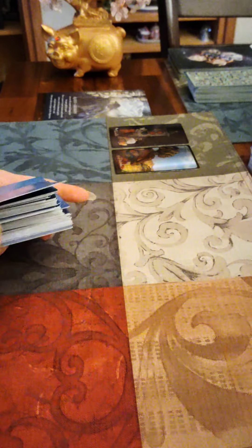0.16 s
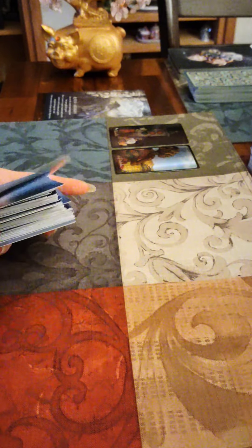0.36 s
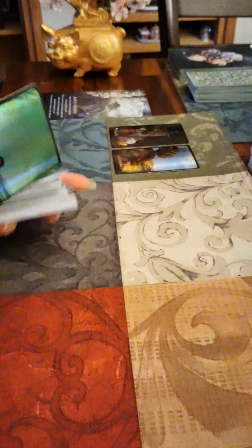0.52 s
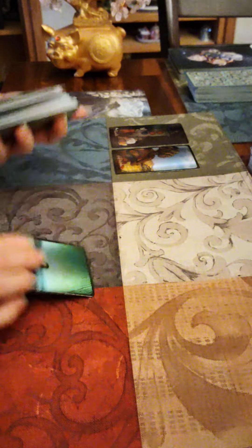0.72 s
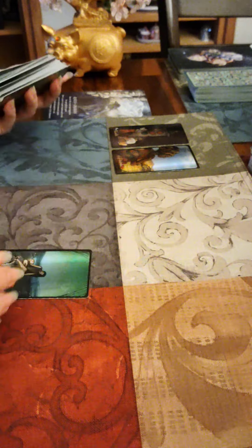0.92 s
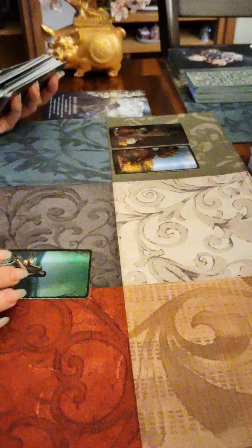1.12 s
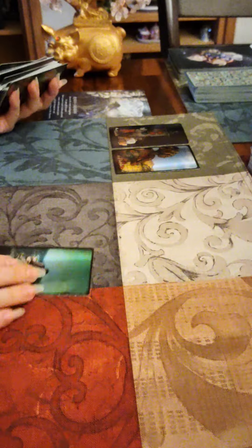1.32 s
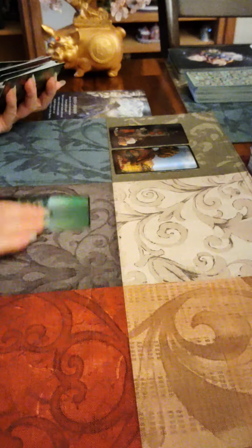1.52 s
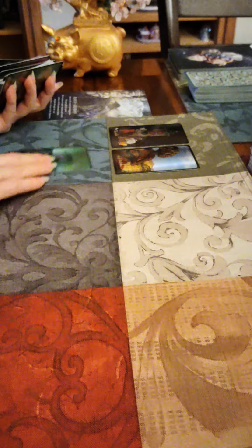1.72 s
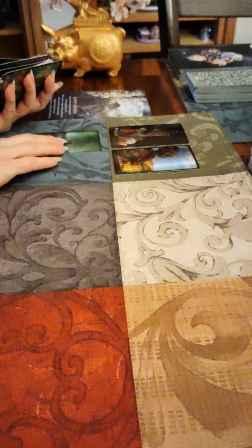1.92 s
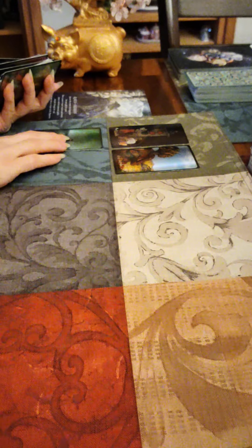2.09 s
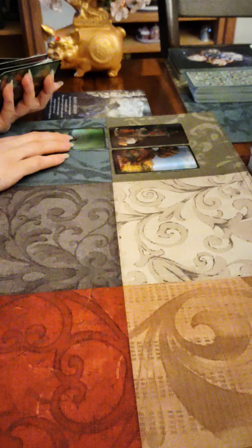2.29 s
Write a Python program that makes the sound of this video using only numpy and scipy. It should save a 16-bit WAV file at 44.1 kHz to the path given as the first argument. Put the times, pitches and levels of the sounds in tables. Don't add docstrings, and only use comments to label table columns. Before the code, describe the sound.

Close phone pickup in a small quiet room: a thumb rubs a deck with papery ticks, a card flicks free in a double snap, skids and slaps onto clothed table, nails click, and it slides over the weave.

```python
import sys
import numpy as np
from scipy import signal
from scipy.fft import rfft, irfft
from scipy.io import wavfile
from scipy.ndimage import uniform_filter1d

SR = 44100
rng = np.random.default_rng(int(sys.argv[2]) if len(sys.argv) > 2 else 0)


def pcm_store(signal):
    levels = np.round(np.clip(np.atleast_2d(signal), -1, 1) * 32767)
    wavfile.write(sys.argv[1], SR, levels.astype(np.int16).T)


def level_to_linear(level):
    exponent = np.asarray(level, float) / 20
    return 10 ** exponent


N = 103635


def evened(x):
    return x / np.sqrt(np.mean(x ** 2) + 1e-20)


def along(points, column=1):
    rows = np.array(points)
    return np.interp(np.arange(N) / SR, rows[:, 0], rows[:, column])


def read(points, hz):
    f, value = np.transpose(points)
    return np.interp(np.log(hz + 1), np.log(f + 1), value)


def colour(x, points):
    gain = level_to_linear(read(points, np.fft.rfftfreq(N, 1 / SR)))
    return evened(irfft(rfft(x) * gain, N))


def resonate(x, hz, width_hz):
    turn = np.exp(2j * np.pi * np.cumsum(hz * np.ones(len(x))) / SR)
    r = np.exp(-np.pi * width_hz / SR)
    return 2 * (turn * signal.lfilter([1 - r], [1, -r], x / turn)).real


def grit(per_s, spread_db, smooth, clump_s, clump_db):
    size = level_to_linear(spread_db * np.minimum(rng.exponential(1, N), 4))
    clicks = rng.standard_normal(N) * size * (rng.random(N) < per_s / SR)
    span = max(int(clump_s * SR), 2)
    clumps = evened(uniform_filter1d(uniform_filter1d(rng.standard_normal(N), span), span))
    return (evened(clicks) + smooth * rng.standard_normal(N)) * level_to_linear(clump_db * clumps)


def modes(part, t, pitch=1):
    return sum(level_to_linear(db - 60 * t / t60) * np.cos(2 * np.pi * hz * pitch * t - .6) for hz, db, t60 in part)


def hits(rows, parts, crack_s, crack, click, thin_hz, dull_hz):
    t, out = np.arange(4096) / SR, np.zeros(N + 8192)
    push = t[:256] * np.exp(-t[:256] / .00009)
    thin = signal.butter(2, thin_hz, "high", fs=SR)
    dull = signal.butter(2, dull_hz, fs=SR)
    edge_only = signal.butter(3, 4900, "high", fs=SR)
    for s, low_db, mid_db, top_db, mid_hz in rows:
        noise = rng.standard_normal(512)
        blow = crack * noise * np.exp(-t[:512] / crack_s)
        blow[0] = -1
        blow = signal.lfilter(*thin, blow)
        crackling_push = push + .4 * push.max() * noise[:256] * np.exp(-t[:256] / crack_s)
        low = -signal.fftconvolve(crackling_push, modes(parts[0], t))[:4096]
        mid = modes(parts[1], t, mid_hz / parts[1][0][0]) + click * np.exp(-t * 9000)
        mid = signal.lfilter(*dull, signal.fftconvolve(blow, mid)[:4096])
        top = signal.lfilter(*edge_only, signal.fftconvolve(blow, modes(parts[2], t))[:4096])
        at = round(s * SR)
        for db, x in ((low_db, low), (mid_db, mid), (top_db, top)):
            out[at:at + 4096] += level_to_linear(db) * x / abs(x).max()
    return out[:N]


# t/s, level/dB
DRAUGHT_LEVEL = [(0, -46), (.45, -38), (.85, -34), (1.3, -41), (2.35, -46)]


def draught():
    t, phase = np.arange(N) / SR, rng.random(24)
    swing_hz = np.geomspace(2.5, 17, 24)
    swings = sum(np.sin(2 * np.pi * (hz * t + p)) / hz ** 0.75 for hz, p in zip(swing_hz, phase))
    return level_to_linear(along(DRAUGHT_LEVEL)) * evened(swings)


# f/Hz, level/dB per Hz
FLOOR_TONE = [(15, -11), (25, 4), (42, -17.5), (65, -13.5), (274, -33), (1030, -35.5), (1590, -41),
              (7600, -42.5), (8590, -66), (11200, -99), (18900, -120)]


def floor():
    hiss = colour(rng.standard_normal(N), FLOOR_TONE)
    hum = evened(resonate(resonate(grit(300, 1.8, 1.8, 0.013, 2.0), 269, 170), 255, 270))
    return level_to_linear(-55.5) * hiss + level_to_linear(-72.5) * hum


# start t/s, length/s, face level/dB, edge level/dB
THUMB_RUBS = [(-.01, 0.094, -63, -82), (0.055, 0.11, -68.5, -70.5), (0.159, 0.048, -59.5, -85),
              (0.208, 0.031, -62.5, -62), (.225, 0.077, -62.5, -75), (0.298, 0.026, -54.5, -81.5),
              (0.324, 0.019, -55, -77), (0.341, 0.032, -54.5, -71), (0.37, 0.046, -57.5, -76),
              (0.402, 0.16, -56, -70), (0.484, 0.077, -47.5, -84), (0.577, 0.024, -60, -60),
              (0.635, 0.025, -62.5, -85), (0.6, 0.2, -62, -64), (.662, 0.021, -61, -68)]
# f/Hz, width/Hz, level/dB
RUBBED_FACE = [(694, 500, -7.5), (1300, 870, -5.5), (1810, 1360, -1.5), (2900, 190, -21),
               (4200, 1400, -20.5)]


def thumb():
    g, t = grit(5000, 1.3, 0.66, 0.0021, 1.2), np.arange(N) / SR
    face = evened(sum(level_to_linear(db) * evened(resonate(g, hz, width_hz)) for hz, width_hz, db in RUBBED_FACE))
    edge = evened(resonate(resonate(g, 6200, 2200), 6100, 2200))
    out = np.zeros(N)
    for s, length_s, face_db, edge_db in THUMB_RUBS:
        rise = np.clip((t - s) / 0.006, 0, 1)
        fall = np.clip((s + length_s - t) / (0.43 * length_s), 0, 1)
        out += rise * fall * (level_to_linear(face_db) * face + level_to_linear(edge_db) * edge)
    return out


# start t/s, length/s, f/Hz, width/Hz, level/dB
STIR_SWELLS = [
    (.88, .36, 800, 500, -68),
    (.95, .3, 250, 80, -69),
    (2.16, .15, 310, 50, -70),
    (2.16, .17, 460, 50, -70),
    (.02, .08, 360, 60, -70),
]


def stirs():
    g, t, out = rng.standard_normal(N), np.arange(N) / SR, np.zeros(N)
    for s, length_s, hz, width_hz, db in STIR_SWELLS:
        swell = np.sin(np.pi * np.clip((t - s) / length_s, 0, 1)) ** 0.43
        out += level_to_linear(db) * swell * evened(resonate(resonate(g, hz, width_hz), hz, width_hz))
    return out


# t/s, body level/dB, face level/dB, edge level/dB, face
# f/Hz
DECK_TICKS = [(.053, -46, -44, -50.5, 1620), (.181, -41, -53.5, -53.5, 1570), (.3005, -55, -43, -65, 1790),
              (.3232, -47.5, -45, -48, 2000), (.330, -70, -42.5, -68, 1790), (.349, -64, -35.5, -62, 1790),
              (.358, -70, -46, -51.5, 1800), (.379, -70, -47, -71, 1900), (.3885, -70, -43, -65, 1840),
              (.398, -52, -33, -46.5, 1770), (.4045, -67.5, -49, -65, 1830), (.415, -70, -44, -57, 1950),
              (.419, -64, -41.5, -56, 1950), (.430, -68, -59, -57, 1900), (.592, -56, -51, -55, 1500),
              (.5997, -51, -38.5, -46.5, 1470), (.606, -49, -44.5, -41, 1380),
              (.6095, -67, -44, -43.5, 1460), (.643, -48.5, -60, -62.5, 1390),
              (.6465, -42.5, -49.5, -65, 1400), (.693, -61, -51, -66, 1700), (2.047, -71, -51, -65, 2900),
              (2.070, -78, -48, -70, 1950)]
# f/Hz, level/dB, t60/s
DECK_BODY = [(357, -23, 0.014), (710, 1.5, 0.042), (1360, 10, 0.026)]
# f/Hz, level/dB, t60/s
CARD_FACE = [(1780, 0, .013), (2300, -8, .006), (3000, -7, .005), (3800, -7, .006), (4600, -9, .005)]
# f/Hz, level/dB, t60/s
CARD_EDGE = [(5350, -19, .004), (5770, 6.5, 0.014), (7300, 8.5, 0.006), (6940, -19, 0.0028)]


def ticks():
    return hits(DECK_TICKS, (DECK_BODY, CARD_FACE, CARD_EDGE),
                crack_s=.0011, crack=.2, click=.1, thin_hz=1100, dull_hz=3900)


# t/s, body level/dB, face level/dB, edge level/dB, face f/Hz
FIRST_CORNER = [
    (.4682, -30, -32, -44, 1510),
    (.4693, -22.5, -29.5, -29, 1900),
    (.476, -18, -26, -25, 1736),
    (.4783, -26.5, -33.5, -38, 1790),
]
# f/Hz, level/dB, t60/s
BENT_CARD = [(129, -28, 0.025), (248, -6, 0.089), (320, -4.5, 0.089), (395, -6.5, 0.075),
             (577, -17, 0.0078), (710, -0.5, 0.027), (1000, -6, 0.013), (1200, -6, .022)]
# f/Hz, level/dB, t60/s
SNAPPING_EDGE = [(5350, 0, .005), (5900, 0, .005), (6600, -1, .005), (7350, -2, .005)]


def first_snap():
    return hits(FIRST_CORNER, (BENT_CARD, CARD_FACE, SNAPPING_EDGE),
                crack_s=.0011, crack=.15, click=.27, thin_hz=640, dull_hz=4700)


# t/s, body level/dB, face level/dB, edge level/dB, face f/Hz
SECOND_CORNER = [
    (.4981, -32, -24, -17.5, 1810),
    (.5007, -14, -30, -15.5, 1745),
    (.5022, -13.5, -33.5, -30.5, 1740),
    (.5037, -20.5, -43, -38, 1300),
    (.5215, -29, -44, -35.5, 1790),
]
# f/Hz, level/dB, t60/s
RELEASED_CARD = [(130, -39.5, 0.033), (256, -7.5, 0.068), (385, 3, 0.038), (705, -0.5, 0.023),
                 (1000, -20, .01), (1277, 1, 0.017)]


def second_snap():
    return hits(SECOND_CORNER, (RELEASED_CARD, CARD_FACE, SNAPPING_EDGE),
                crack_s=.0011, crack=.15, click=.27, thin_hz=490, dull_hz=5200)


# t/s, level/dB
SKID_LEVEL = [(.73, -61), (.748, -53), (.7595, -53), (.761, -43.5), (.771, -47), (.774, -59), (.777, -42),
              (.79, -35.5), (.83, -49.5), (.9, -65), (1.0, -71.5)]
# f/Hz, level/dB per Hz
SCRAPE_TONE = [(470, -44), (800, -12), (3800, -3), (5330, -5.5), (6800, -4), (7900, -11), (8590, -12),
               (11200, -52), (18900, -120)]


def skid():
    t = np.arange(N) / SR
    on = (t > SKID_LEVEL[0][0]) * (t < SKID_LEVEL[-1][0])
    return on * level_to_linear(along(SKID_LEVEL)) * colour(grit(6000, 4.9, 0.93, 0.0032, 0.37), SCRAPE_TONE)


# t/s, table level/dB, face level/dB, edge level/dB, face f/Hz
LANDING = [
    (.786, -32, -32, -59, 1370),
    (.7948, -18, -12, -30, 1521),
    (.7956, -35.5, -23, -42, 1480),
    (.797, -46.5, -18, -39.5, 1500),
    (.8012, -26, -15, -39, 1465),
    (.8035, -37.5, -23.5, -44, 1500),
    (.8077, -37.5, -20, -42, 1490),
    (.810, -60, -22.5, -48, 1460),
    (.819, -32, -34, -51, 1450),
    (.829, -33, -29, -53.5, 1520),
]
# f/Hz, level/dB, t60/s
CLOTHED_TABLE = [(69, 4, 0.035), (164, -12, 0.042), (264, -7.5, 0.026), (490, 2, 0.022), (770, -24, 0.004)]
# f/Hz, level/dB, t60/s
FLAT_CARD = [(1470, 0, .013), (2030, -1.5, .013), (3100, -10, .008), (4160, -14, .006)]


def slap():
    return hits(LANDING, (CLOTHED_TABLE, FLAT_CARD, CARD_EDGE),
                crack_s=.0012, crack=.12, click=3.6, thin_hz=180, dull_hz=7000)


# t/s, table level/dB, nail level/dB, edge level/dB, nail f/Hz
NAIL_CLICKS = [
    (.7888, -37.5, -26, -31, 3520),
    (.7897, -54, -17.5, -28, 3570),
    (.7915, -25, -30, -32, 3400),
    (1.3693, -52, -41, -56, 2950),
    (1.371, -50, -21, -41.5, 3180),
    (1.4057, -51, -15.5, -51, 3450),
    (1.4075, -66, -27, -53, 3400),
    (1.414, -61, -41, -52, 3400),
]
# f/Hz, level/dB, t60/s
FINGERNAIL = [(3400, 5.5, 0.0082), (1950, -1.5, 0.0075), (2500, -12, .004), (4200, 2.5, 0.0023),
              (4820, -8, .004), (7200, -4.5, 0.0064)]


def nails():
    return hits(NAIL_CLICKS, (CLOTHED_TABLE, FINGERNAIL, CARD_EDGE),
                crack_s=.0005, crack=.1, click=.1, thin_hz=1600, dull_hz=12000)


# t/s, level/dB, brightness/dB
SLIDE_LEVEL = [(1.368, -46, -13), (1.379, -50, 0), (1.395, -51, -5), (1.42, -46.5, 0.5), (1.47, -47, 0),
               (1.51, -42, 1.5), (1.6, -39, -1), (1.71, -42, 0), (1.78, -44, -0.5), (1.82, -46.5, -1),
               (2.0, -54, -1), (2.12, -63, -3), (2.23, -62.5, 0.5), (2.3, -78.5, 5)]
# f/Hz, level/dB per Hz
WEAVE_TONE = [(180, -42), (300, -19.5), (779, -12), (1060, -13.5), (1810, -2.5), (3400, -1.5), (7360, -7),
              (8590, -14.5), (11200, -61), (18900, -120)]
# t/s, low f/Hz, main f/Hz, upper f/Hz, top f/Hz
PRESSED_PITCH = [(1.37, 2020, 3360, 4500, 7300), (1.55, 2010, 3520, 4700, 7400),
                 (1.66, 2100, 3360, 4900, 7300), (1.71, 2300, 3400, 4850, 7200),
                 (1.74, 2500, 3300, 5770, 7200), (1.8, 2100, 3120, 5880, 6900),
                 (1.9, 2300, 3200, 4420, 6700), (2.3, 1980, 3260, 4200, 7160)]
# width/Hz, level/dB
PRESSED_WIDTH = [(600, -16), (600, -5.5), (600, -3.5), (900, -4.5)]
# t/s, f/Hz, level/dB
AIR_POCKET = [(1.5, 604, -81.5), (1.62, 840, -55), (1.72, 960, -89)]


def slide():
    g = grit(7000, 3.5, 2.4, 0.018, 0.54)
    ring = sum(level_to_linear(db) * resonate(g, along(PRESSED_PITCH, k), width_hz)
               for k, (width_hz, db) in enumerate(PRESSED_WIDTH, 1))
    hz, t, z = signal.stft(colour(g + ring, WEAVE_TONE), SR, nperseg=256)
    patches = uniform_filter1d(rng.standard_normal(z.shape[::-1]), size=9, axis=0)
    patches = evened(uniform_filter1d(patches, size=5, axis=1)).T
    brightness_db = along(SLIDE_LEVEL, 2)[np.minimum(t * SR, N - 1).astype(int)]
    tilt_db = np.clip(np.log2((hz[:, None] + 1) / 4000), 0, 1) * brightness_db
    rub = signal.istft(z * level_to_linear(1.24 * patches + 2 * tilt_db), SR, nperseg=256)[1][:N]
    pocket_hz = along(AIR_POCKET)
    pocket = evened(resonate(resonate(g, pocket_hz, 330), pocket_hz, 330))
    on = np.arange(N) > SLIDE_LEVEL[0][0] * SR
    return on * (level_to_linear(along(SLIDE_LEVEL)) * rub + level_to_linear(along(AIR_POCKET, 2)) * pocket)


def notched(x):
    near = np.arange(N) < 1.72 * SR
    return x - .5 * near * resonate(x, 5500, 800)


# f/Hz, t60/s
ROOM_DECAY = [(150, .25), (600, .42), (1100, .42), (2000, .3), (8000, .22)]
# f/Hz, level/dB
ROOM_LEVEL = [(150, -8), (400, -7.5), (750, -13.5), (2500, -9.5), (6000, -11.5)]


def room(x):
    hz, t, z = signal.stft(rng.standard_normal(SR // 2), SR, nperseg=256)
    t60 = read(ROOM_DECAY, hz)[:, None]
    decay = level_to_linear(read(ROOM_LEVEL, hz)[:, None] - 60 * t / t60)
    unit_energy = np.sqrt(SR * t60 / (6 * np.log(10)))
    tail = signal.istft(z * decay / unit_energy, SR, nperseg=256)[1]
    build_up = np.clip(np.arange(len(tail)) / SR / 0.0038 - .3, 0, 1)
    return signal.fftconvolve(x, tail * build_up)[:N]


def scene():
    deck = ticks() + first_snap() + second_snap()
    table = slap() + notched(nails() + thumb() + skid() + slide())
    reflections = room(level_to_linear(-5) * deck + table)
    return (deck + table + reflections + floor() + stirs() + draught())[None]


def top_cut(x):
    return signal.sosfilt(signal.butter(12, 8740, fs=SR, output="sos"), x)


def record(dry):
    low_pass = signal.firwin(161, 8012, window=("kaiser", 8), fs=SR)
    mix = signal.oaconvolve(dry, low_pass[None], "same")
    return top_cut(mix)


dry = scene()
out = record(dry)
pcm_store(out)
```